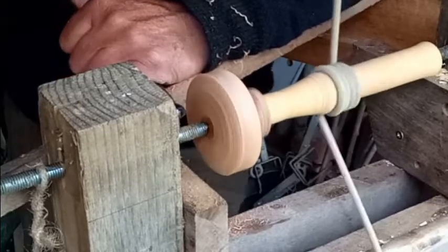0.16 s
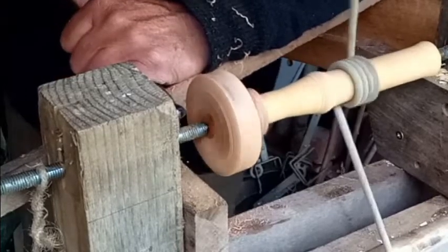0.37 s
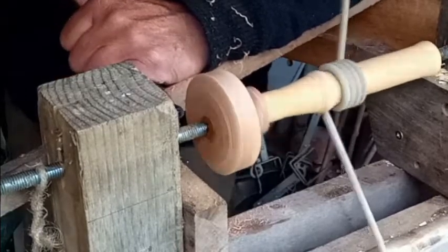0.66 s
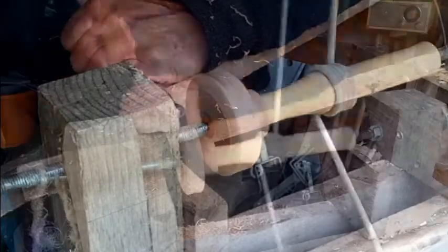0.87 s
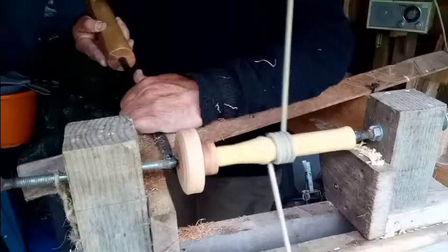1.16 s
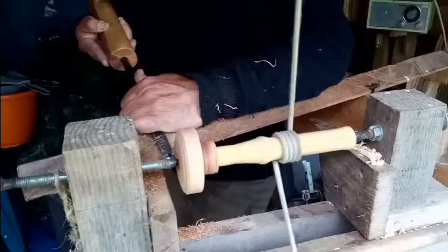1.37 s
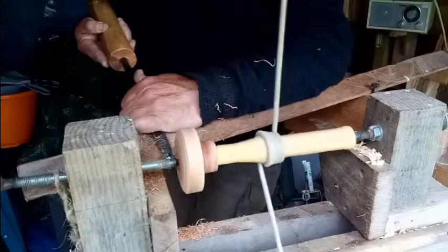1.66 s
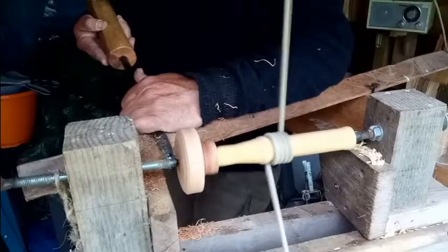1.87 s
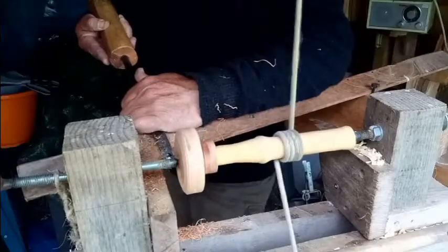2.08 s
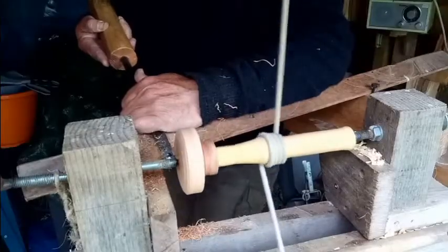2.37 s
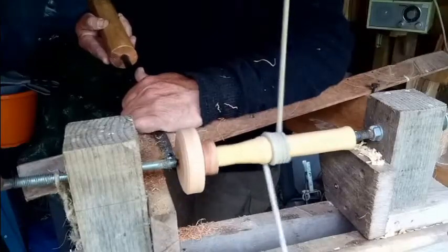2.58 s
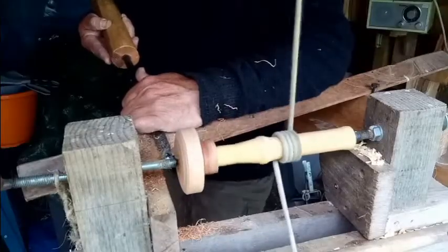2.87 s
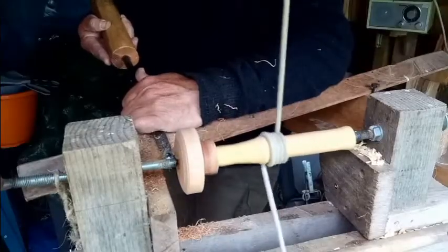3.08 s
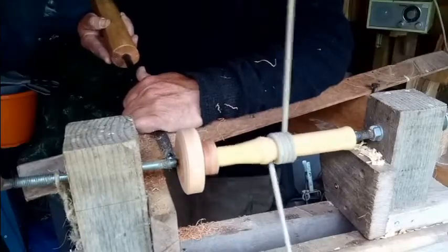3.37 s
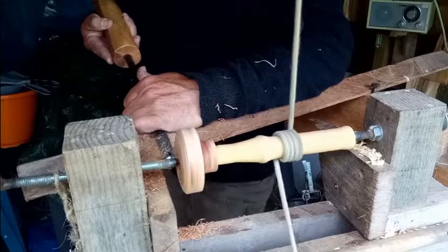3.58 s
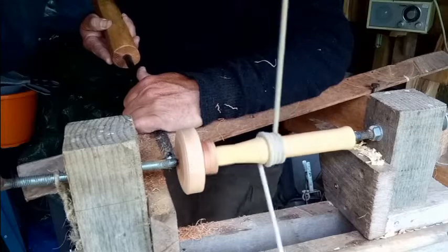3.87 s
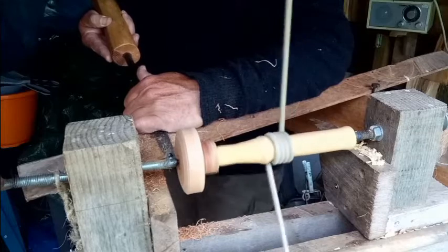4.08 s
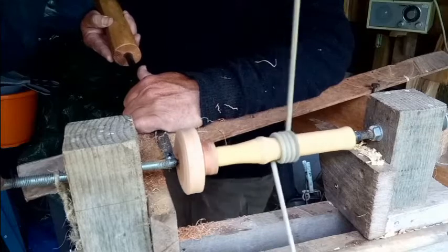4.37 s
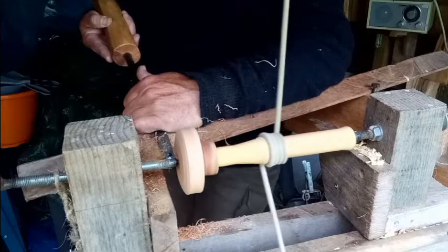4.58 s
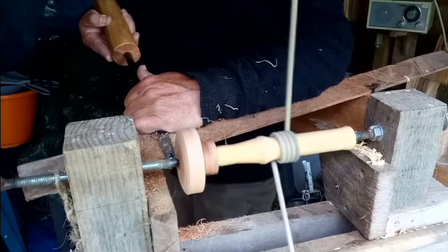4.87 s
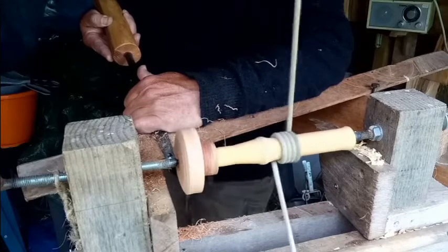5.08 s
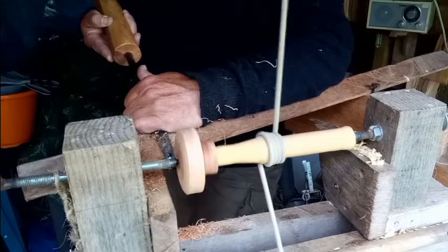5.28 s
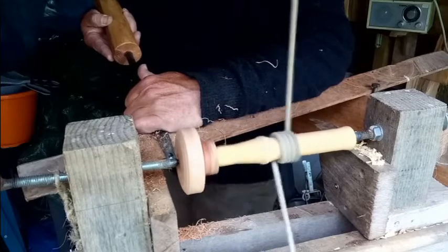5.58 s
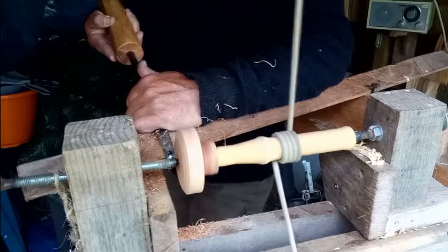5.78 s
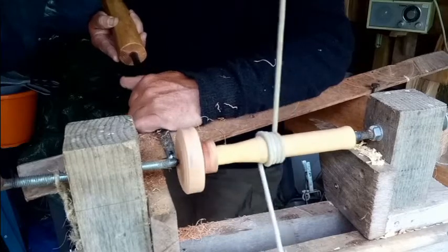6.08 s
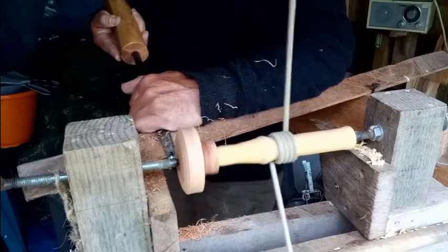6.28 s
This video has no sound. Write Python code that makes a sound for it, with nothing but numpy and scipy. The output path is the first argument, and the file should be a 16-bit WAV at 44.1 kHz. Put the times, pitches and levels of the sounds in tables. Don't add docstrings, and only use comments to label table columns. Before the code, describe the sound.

A foot-powered lathe is heard very close in a small shed, dry with a short echo and faint still air. Steel ticks lightly, and at about 0.2 s a gouge rasps into spinning wood, a bright, throbbing scrape with metallic ringing. A heavy cluster of hollow wooden knocks follows near 0.45 s. Further scrapes, each roughly 0.3 to 0.4 s, start near 0.95, 1.8, 2.5, 3.2, 4.0, 4.7, 5.5 and 6.15 s, the second longest, the third lighter. Small taps and brief steel rings precede many cuts, clear around 2.5 and 3.2 s. Between cuts the cord rubs softly, a dry centre squeaks faintly, and the frame rumbles. Several knocks cluster around 2.1 s, a sharp cord slap and thump land at 3.6 s, lighter knocks near 4.95 s, and a strong thump at 5.67 s. A last knock comes near 6.4 s.

```python
import sys
import numpy as np
from scipy import signal
from scipy.fft import rfft, irfft, next_fast_len
from scipy.io import wavfile
from scipy.ndimage import uniform_filter1d, map_coordinates

SR = 44100
rng = np.random.default_rng(int(sys.argv[2]) if len(sys.argv) > 2 else 0)


def elevation(decibels):
    levels = np.asarray(decibels, float)
    return 10 ** (levels / 20)


def output_pcm(signal):
    pcm = np.clip(np.atleast_2d(signal).T, -1, 1) * 32767
    wavfile.write(sys.argv[1], SR, np.round(pcm).astype(np.int16))


N = 284000
MS = np.arange(0, N / SR + .002, .001)

# f/Hz, level/dB per Hz
AIR = [(15, -58.5), (25, -14), (84, -2.5), (326, -1), (489, -7), (560, -17.5), (734, 2), (962, -4),
       (1330, -2), (3520, -14.5), (6380, -13), (10400, -29), (13600, -37.5), (14600, -25.5), (15400, -17),
       (16000, -27)]
# f/Hz, t60/s
SHED = [(200, 0.097), (2000, 0.19), (10000, 0.022)]
# f/Hz, left re right/dB
LEAN = [(60, 6), (110, 0), (200, 1), (380, 3.5), (700, 0.5), (1290, 1), (2380, 1), (4400, 6.5), (8120, 9),
        (15000, 14)]
# f/Hz, correlation/1
ALIKE = [(60, 0.93), (300, 0.93), (700, 0.62), (1500, .35), (4000, 0.45), (5300, 0.25), (5900, .82),
         (7300, .78), (7900, .12)]
# f/Hz, left lead/rad
TURN = [(20, 0), (600, .4), (1290, 1.1), (1550, 3), (1850, 6.3), (3000, 6.3), (3360, 8.8), (3750, 10.6),
        (4400, 9.6), (5100, 12.2), (5700, 12.57)]

# f/Hz, width/Hz, level/dB
BEAMS = [(154.4, 25, -6.5), (245.5, 112, -1.5), (382, 202, -2), (467.7, 66, 0), (655, 105, -5.5),
         (780, 251, -9.5)]
# t of full load/s, rumble level/dB, build-up/s, let-go/s, pole drone level/dB
LOADS = [(0.02, -55, 0.11, 0.089, -60.5), (0.474, -37, 0.12, 0.096, -49), (0.56, -59.5, 0.1, 1, -57),
         (1.22, -46, 0.2, 0.16, -54), (1.3, -61, 0.092, 0.079, -53), (1.6, -66, 0.16, 0.097, -93),
         (2.03, -42.5, 0.11, 0.32, -54), (2.15, -42.5, 0.15, 0.13, -68), (2.77, -45.5, 0.14, 0.16, -62),
         (2.99, -64, 0.067, 0.27, -72), (3.5, -43, 0.14, 0.14, -57), (3.641, -45.5, 0.12, 0.2, -51.5),
         (4.18, -51, 0.11, 0.26, -56), (4.56, -65, 0.16, 0.13, -77), (5.27, -63.5, .15, 0.094, -74),
         (4.969, -49.5, 0.18, 0.058, -51.5), (5.702, -38.5, 0.13, 0.095, -46), (5.9, -59, 0.054, 0.23, -63),
         (6.44, -39.5, 0.15, 0.1, -57)]
IDLE_RUMBLE_DB, IDLE_DRONE_DB, DRONE_BUILD_S, DRONE_FADE_S = -80, -72, 0.15, 0.088
SWELL_DB = 25
# f/Hz, level/dB per Hz
CORD = [(290, -34), (500, 6.5), (538, -3.5), (933, -14.5), (1340, -2), (2130, -12.5), (2770, -8.5),
        (3390, -15.5), (3750, -11), (4090, -14.5), (6420, -15), (9000, -34.5), (11000, -35.5), (16000, -40)]
# t of hardest rub/s, level/dB, build-up/s, let-go/s
RUBS = [(0.0, -60, 0.16, 0.17), (0.133, -78.5, 0.033, 0.3), (0.725, -61.5, 0.44, 0.56),
        (1.47, -65.5, 0.68, 1), (2.146, -57, 0.14, 0.12), (2.25, -65.5, 0.05, 0.68),
        (2.958, -62.5, 0.054, 0.45), (3.608, -50.5, 0.014, 0.091), (3.7, -67, 0.1, 0.96),
        (4.544, -65, 0.18, 0.21), (5.28, -66, 0.37, 0.13), (5.876, -63.5, 0.042, 0.5)]
# t/s, length/s, f/Hz, level/dB
CENTRE = [(0.246, 0.29, 278, -56.5), (0.618, 0.16, 3700, -69), (0.616, 0.088, 2900, -71.5),
          (1.392, 0.12, 3680, -63), (1.44, .07, 1655, -69), (1.44, .04, 2350, -69), (0.718, .06, 2780, -68),
          (1.6, 0.12, 241, -62), (1.64, 0.06, 2600, -71), (2.305, .04, 3150, -70.5),
          (2.972, .06, 5550, -69), (2.97, .06, 3930, -69), (3.0, 0.076, 2890, -72),
          (4.498, 0.16, 2590, -76), (5.226, .09, 4670, -68)]
# t/s, level/dB, f/Hz, width/Hz, t60/s
SLAPS = [(0.586, -49.5, 2300, 4770, 0.1), (1.459, -43.5, 6900, 7900, 0.017),
         (2.122, -41, 2600, 3940, 0.044), (2.95, -53, 2000, 3000, 0.051), (3.606, -40, 3700, 3000, 0.18),
         (3.607, -28, 3420, 300, 0.035), (5.67, -27, 1250, 660, 0.065), (5.69, -40, 1050, 1450, 0.22),
         (0.48, -29, 1330, 600, .06), (0.12, -54, 3100, 3000, 0.032), (2.271, -52, 1600, 2500, 0.044),
         (2.148, -46, 2500, 900, 0.055), (2.7, -39, 1550, 400, 0.052), (2.207, -50, 1600, 1200, .04),
         (0.63, -45, 710, 900, 0.047), (5.101, -56, 1100, 1500, 0.039), (5.873, -57, 2600, 5040, 0.063)]
# t/s, peak level/dB, loudest f/Hz, t60/s
KNOCKS = [(0.397, -17.5, 826, 0.049), (0.459, -7, 350, 0.064), (0.471, -11, 575, 0.028),
          (0.482, -23, 366, 0.071), (0.506, -30, 320, 0.095), (0.552, -28, 516, 0.043),
          (0.584, -36, 470, 0.052), (1.266, -27, 470, 0.039), (1.32, -34, 308, 0.14),
          (1.582, -46.5, 496, 0.065), (1.995, -23, 676, 0.054), (2.076, -19, 213, 0.052),
          (2.117, -17, 445, 0.04), (2.147, -18.5, 438, 0.075), (2.207, -27, 518, 0.034),
          (2.267, -37, 298, 0.25), (2.71, -23, 443, 0.07), (2.806, -18.5, 238, 0.032),
          (2.951, -44, 520, 0.072), (3.056, -40.5, 474, 0.32), (3.451, -18, 705, 0.039),
          (3.594, -32, 506, 0.13), (3.608, -10, 453, 0.039), (3.687, -27.5, 683, 0.051),
          (4.218, -26, 759, 0.16), (4.411, -60, 424, 0.063), (4.943, -24, 730, 0.062),
          (4.958, -23, 800, 0.091), (4.975, -27, 620, 0.075), (5.615, -25.5, 472, 0.17),
          (5.6702, -6, 370, 0.063), (5.6755, -10.5, 326, 0.06), (5.69, -8, 504, 0.051),
          (5.709, -17, 650, 0.044), (5.737, -22, 683, 0.053), (5.72, -25, 396, 0.068),
          (5.752, -21, 365, 0.051), (5.781, -35, 150, 0.19), (5.875, -34, 468, 0.065),
          (6.379, -20, 500, 0.087)]

# f/Hz, width/Hz, level/dB
REST = [(813, 16, -4), (1223, 11.5, -2.5), (1662, 34, -2), (2036, 42, -13.5), (2760, 31, -10.5),
        (3368, 36, 1), (4300, 70, 2), (4630, 56, -9.5), (7200, 97, -9)]
# t/s, peak level/dB, low f/Hz, high f/Hz, high re low/dB
TAPS = [(0.1341, -53, 2370, 4000, 3), (0.201, -49, 2490, 5160, 9), (0.2217, -37, 1560, 6840, -11),
        (0.943, -48, 3400, 7200, 4), (0.961, -37, 1560, 5070, -15), (1.79, -46, 1780, 7140, -1),
        (2.4559, -38, 2070, 4660, -6.5), (2.512, -32.5, 2390, 6460, -7), (3.1745, -39.5, 2100, 3450, -9),
        (3.236, -36.5, 1950, 3900, -1), (3.9408, -50, 2150, 3810, -11), (3.992, -41, 3520, 6200, -7),
        (4.738, -39.5, 3450, 7330, 17), (5.478, -31, 2470, 7140, 19), (6.075, -55, 1800, 3720, 7),
        (6.097, -46.5, 1900, 3630, 5), (6.114, -52.5, 1910, 3800, -5), (6.1534, -43, 1910, 6660, -9)]
TAP_T60_S, TAP_HIGH_DAMPS = 0.089, 0.026
TICK_DB, TICK_T60_S = -27, 0.035
# t/s, f/Hz, peak level/dB, t60/s
CATCHES = [(2.456, 1680, -44, .2), (2.459, 2116, -45, .15), (2.455, 3456, -50, .07),
           (2.459, 4064, -46, .07), (2.455, 7138, -48, .08), (2.455, 4700, -51, .06),
           (2.475, 4660, -47, .08), (2.475, 2756, -48, .1), (2.478, 1254, -53, .15),
           (2.476, 1680, -47, .15), (2.474, 4100, -48, .06), (3.174, 2110, -40, .13),
           (3.176, 1701, -44, .2), (3.178, 4156, -46, .11), (3.175, 7090, -47, .12), (3.178, 759, -54, .4),
           (3.177, 3817, -54, .11), (3.94, 2120, -55, .15), (3.94, 3860, -59, .15), (3.222, 4100, -51, .05),
           (6.075, 3505, -51, .09), (6.075, 4727, -56, .07), (6.076, 7144, -57, .06),
           (6.094, 4180, -57, .09), (6.099, 4700, -53, .1), (6.104, 760, -57, .3), (6.112, 1620, -54, .12),
           (4.734, 4600, -50, .15), (4.734, 3450, -54, .1)]
# t/s, length/s, f/Hz, level/dB
SINGS = [(0.205, .04, 5240, -44.5), (0.22, 0.068, 1020, -42.5), (0.293, 0.074, 1020, -40.5),
         (0.425, .04, 1001, -43), (1.03, 0.1, 1020, -37.5), (1.17, 0.044, 801, -47), (4.8, .07, 2390, -47),
         (2.57, 0.23, 3830, -38), (2.64, 0.099, 1060, -38), (3.235, .04, 780, -42.5),
         (3.29, 0.19, 774, -44), (.225, 0.1, 1620, -46), (4.03, 0.062, 780, -42),
         (4.765, 0.035, 6140, -37.5), (4.929, .06, 7100, -41), (0.957, 0.028, 5240, -52),
         (0.973, .05, 606, -44), (1.106, 0.048, 7040, -39.5), (1.835, 0.14, 1056, -40),
         (1.86, 0.15, 3830, -37), (3.28, 0.044, 4100, -34), (3.398, 0.094, 3110, -44),
         (4.111, 0.07, 4585, -34), (5.493, 0.081, 3830, -31), (5.53, 0.08, 1060, -39),
         (5.51, .04, 3090, -42), (5.57, 0.094, 3120, -44), (5.55, .025, 3830, -37),
         (5.52, 0.045, 2400, -44), (6.152, 0.081, 757, -45.5), (6.164, 0.056, 1830, -45.5)]

# t of bite/s, run-up/s, full speed/s, run-down/s, shaving level/dB
STROKES = [
    (0.211, 0.055, 0.14, 0.13, -32.5),
    (0.95, 0.062, 0.21, 0.15, -32),
    (1.782, 0.049, 0.18, 0.1, -34.5),
    (2.494, 0.074, 0.17, 0.11, -34),
    (3.223, 0.072, 0.2, 0.099, -33),
    (3.982, 0.064, 0.17, 0.11, -31.5),
    (4.733, 0.072, 0.13, 0.11, -31.5),
    (5.471, 0.034, 0.092, 0.18, -33.5),
    (6.151, 0.057, 0.17, 0.094, -32.5),
]
# t of a meeting/s, rate/Hz, depth/dB, reach of the gouge/1
GRAIN = [
    (0.252, 65, -2, 0.76),
    (1.033, 29.1, 1, 0.53),
    (1.83, 21, 1, 0.28),
    (2.528, 43.5, 2, 0.08),
    (3.298, 36, 1.3, 0.17),
    (4.055, 54, -0.5, 0.07),
    (4.788, 46, 0.1, 0.09),
    (5.509, 45.6, 2, 0.17),
    (6.2, 36.7, -1.2, 0),
]
# edge re shaving/dB, spindle re shaving/dB, centres re shaving/dB
HOLDS = [
    (-6, -8, -31),
    (-6, -12.5, -15.5),
    (-2.5, -10.5, -25),
    (-4, -9.5, -17.5),
    (-4, -9, -16.5),
    (-3.5, -9.5, -18),
    (-3.5, -8, -20),
    (-3.5, -12, -20),
    (-3.5, -8.5, -20.5),
]
FEED = [
    0.86,
    1.12,
    1.13,
    1.03,
    1,
    1.1,
    1,
    1.07,
    1.17,
]
CREEP = 0.17
REACH_WANDERS = 0.15
SHAVE_LAW, EDGE_LAW = (1.21, 2.28, -0.0546), (1.72, 3.37, -1.1)
SPINDLE_LAW, CENTRES_LAW = (1.7, 1.63, 5.3), (0.81, 1, 13)
# f/Hz, width/Hz, level/dB
TOOL = [(747, 54, -7.5), (1056, 33, -4.5), (1780, 87, -6.5), (2390, 30, -0.5), (2780, 40, -16),
        (3110, 20, 1), (3450, 260, -8), (3800, 26.8, 5.5), (4060, 82, -4), (4585, 61, -1.5),
        (5300, 29, -23), (6046, 51, -3.5), (6684, 97, -8.5), (7140, 86, -2)]
# f/Hz, width/Hz, level/dB
TOOL_OUT = [(759, 38, -9.5), (1020, 21, -5), (1560, 30, -11.5), (1803, 17, -7), (2464, 100, -7),
            (2780, 29, -1.5), (3080, 200, -10), (3404, 36, -2), (3830, 146, 0.5), (4530, 150, -19),
            (5250, 40, -12.5), (6178, 143, 10.5), (6570, 120, 2.5), (7040, 76, 11.5)]
# f/Hz, width/Hz, level/dB
CENTRES_RING = [(504, 24, -10)]
# f/Hz, level/dB per Hz
SHAVING = [(180, -86), (300, -30.5), (499, -2), (588, -5), (753, -10), (1360, -5), (1740, 0), (5200, -3.5),
           (6880, -3.5), (8000, -39), (10400, -52), (17600, -120)]
# f/Hz, level/dB per Hz
SIZZLE = [(4470, -43.5), (7600, -2), (7880, -49.5), (8360, -11.5), (9360, -4.5), (10100, -13),
          (11000, -6.5), (13600, -14.5), (14900, -5), (15800, -11)]


def unit(x):
    return x / np.sqrt(np.mean(x ** 2) + 1e-20)


def along(points, hz):
    f, v = np.transpose(points)
    return np.interp(np.log(hz + 1), np.log(f + 1), v)


def smooth(per_ms):
    return np.interp(np.arange(N) / SR, MS, per_ms)


def wobble(rate):
    knots = rng.standard_normal(int(N * rate / SR) + 5)
    return smooth(map_coordinates(knots, [MS * rate]))


def flutter(t, rate):
    return map_coordinates(rng.standard_normal(40), [rate * t])


def add_at(out, s, sound):
    start = round(s * SR)
    out[..., start:start + sound.shape[-1]] += sound


def row_at(table, t):
    return np.clip(np.searchsorted(np.array(table)[:, 0] - .1, t) - 1, 0, None)


def filtered(x, response, lo_hz=0, hi_hz=0):
    m = next_fast_len(N + SR // 2)
    hz = np.fft.rfftfreq(m, 1 / SR)
    gain = response(hz)
    if hi_hz:
        band = (hz > lo_hz) & (hz < hi_hz)
        gain = gain / np.sqrt(np.sum(np.abs(gain[band]) ** 2) / len(hz))
    return irfft(rfft(x, m) * gain, m)[..., :N]


def resonances(modes, f):
    total = 0
    for k, (centre_hz, width, db) in enumerate(modes):
        damping = 1j * f * width
        total = total + (-1) ** k * elevation(db) * damping / (centre_hz ** 2 - f * f + damping)
    return total


def rush(patchy_db, size=14):
    z = signal.stft(rng.standard_normal((2, N)), nperseg=512)[2]
    field = uniform_filter1d(rng.standard_normal(z.shape[1:]), size=2, axis=0)
    field = uniform_filter1d(field, size=size, axis=1)
    pair = signal.istft(z * elevation(patchy_db * unit(field)), nperseg=512)[1][:, :N]

    def mid_and_side(hz):
        angle = np.arccos(np.clip(along(ALIKE, hz), -1, 1)) / 2
        return np.array([np.cos(angle), np.sin(angle)])
    mid, side = filtered(pair, mid_and_side)
    return unit(np.array([mid + side, mid - side]))


def swells(rows):
    power = 0
    for s, db, rise, fall in rows:
        distance = np.where(MS < s, (s - MS) / max(rise, .01), (MS - s) / max(fall, .01))
        power = power + elevation(2 * (db - SWELL_DB * distance))
    return smooth(np.sqrt(power))


def still_air():
    return filtered(elevation(-68) * rush(patchy_db=1.5), lambda f: elevation(along(AIR, f)), 25, 15770)


def shed(x):
    hz, t, z = signal.stft(rng.standard_normal((2, SR // 3)), SR, nperseg=256)
    alike = np.clip(along(ALIKE, hz), 0, 1)[:, None]
    z[1] = alike * z[0] + np.sqrt(1 - alike ** 2) * z[1]
    decay = elevation(-60 * t / along(SHED, hz)[:, None])
    tail = signal.istft(z * decay, SR, nperseg=256)[1]
    return signal.fftconvolve(x, tail / np.linalg.norm(tail[0]), axes=1)[:, :N]


def frame():
    rumble = swells([load[:4] for load in LOADS]) + elevation(IDLE_RUMBLE_DB + wobble(7.5))
    drone = swells([(s, db, DRONE_BUILD_S, DRONE_FADE_S) for s, *_, db in LOADS])
    drone = drone + elevation(IDLE_DRONE_DB + 4 * wobble(8))
    lumps = rush(patchy_db=3.5) * unit(elevation(2.04 * wobble(70) + 2.6 * wobble(25)))
    beams = filtered(lumps * rumble * elevation(3.0), lambda f: resonances(BEAMS, f), 130, 590)
    hum = rush(patchy_db=0.0) * drone * elevation(0.5)
    pole = filtered(hum, lambda f: resonances([(92.8, 17.4, 0)], f), 65, 160)
    return beams + pole


def cord():
    rub = rush(patchy_db=3.5) * unit(elevation(1.47 * wobble(30))) * swells(RUBS) * elevation(4.5)

    def response(f):
        stirred = elevation(-21) * resonances(TOOL, f) / (1 + (f / 7800) ** 16)
        return elevation(along(CORD, f)) + stirred
    return filtered(rub, response, 980, 8400)


def fluttering(rows):
    out = np.zeros(N + SR)
    for s, length, hz, db in rows:
        t = np.arange(round(length * SR)) / SR
        level = elevation(db + 6.9 * flutter(t, 60)) * np.sin(np.pi * t / length)
        add_at(out, s, level * np.sin(2 * np.pi * hz * t + 1.1 * flutter(t, 80)))
    return out[:N]


def centre():
    return fluttering(CENTRE)


def slaps():
    out, t = np.zeros((2, N + SR)), np.arange(SR // 4) / SR
    f = np.fft.rfftfreq(len(t), 1 / SR)
    for s, db, hz, width, t60 in SLAPS:
        body = resonances([(hz, width, 0)], f) ** 2 / (1 + (f / 7600) ** 12)
        puff = irfft(rfft(rng.standard_normal((2, len(t)))) * body, len(t))
        add_at(out, s, elevation(db - 60 * t / t60) * (1 - np.exp(-t / .003)) * unit(puff))
    return out[:, :N]


def knocks():
    out, t = np.zeros((2, N + SR)), np.arange(SR // 4) / SR
    for s, db, top_hz, t60 in KNOCKS:
        ring = np.sin(2 * np.pi * top_hz * t)
        for hz, _, level in BEAMS:
            strength = elevation(level - 6 + rng.normal(0, 3.8))
            ring = ring + strength * np.sin(2 * np.pi * hz * t + rng.uniform(0, 0.12, (2, 1)))
        envelope = elevation(-60 * t / max(t60, .01)) * (1 - np.exp(-t / 0.002))
        add_at(out, s, elevation(db - 11.0) * ring * envelope)
    return filtered(out[:, :N], lambda f: (1j * f / (80 + 1j * f)) ** 2)


def catches():
    out, t = np.zeros(N + SR), np.arange(SR // 8) / SR
    for s, hz, db, t60 in CATCHES:
        level = elevation(db - 60 * t / t60 + 3 * flutter(t, 150)) * (1 - np.exp(-t / .0015))
        add_at(out, s, level * np.sin(2 * np.pi * hz * t + .7 * flutter(t, 150)))
    return out[:N] * elevation([[2.5], [-5]])


def taps():
    out, t = np.zeros((2, N + SR)), np.arange(SR // 4) / SR
    f = np.fft.rfftfreq(len(t), 1 / SR)
    soft = 1 / (1 + 1j * f / 8000) ** 2
    for s, db, low_hz, high_hz, high_db in TAPS:
        skid = np.exp(-t / 0.018) * (1 - np.exp(-t / 0.0013))
        burst = rng.standard_normal((2, len(t))) * skid
        burst[1] = .8 * burst[0] + .6 * burst[1]
        width = np.log(1000) / np.pi / (TAP_T60_S * np.exp(-TAP_HIGH_DAMPS * high_db))
        modes = []
        for hz, w, level in REST:
            tilt_db = high_db if hz > 3000 else 0
            modes.append((hz, w, level - 2 + rng.normal(0, 2.7) + tilt_db))
        modes += [(low_hz, 1.3 * width, 0), (high_hz, 2.5 * width, high_db + 1)]
        ring = irfft(rfft(burst) * soft * (resonances(modes, f) + elevation(-51)), len(t))
        tick = elevation(TICK_DB - 60 * t / TICK_T60_S) * rng.standard_normal((2, len(t)))
        add_at(out, s, elevation(db + 6.5) * (ring / np.abs(ring).max() + tick))
    return out[:, :N]


def singing_modes():
    return fluttering(SINGS)


def spin(law, trims_db=np.zeros(len(STROKES))):
    starting, stopping, deepens_db = law
    stroke = row_at(STROKES, MS)
    s, rise, hold, fall, db = np.transpose(STROKES)[:, stroke]
    creep = CREEP * np.logaddexp(0, (MS - s) / rise / CREEP)
    up = np.clip(creep, 1e-4, 1)
    down = np.clip((s + rise + hold + fall - MS) / fall, 1e-4, 1)
    depth = np.clip((MS - s - rise) / hold, 0, 1) - .5
    speed = up ** (starting * np.array(FEED)[stroke]) * down ** stopping
    return smooth(db + trims_db[stroke] + deepens_db * depth + 20 * np.log10(speed))


def gouge():
    edge_trim, spindle_trim, centres_trim = np.transpose(HOLDS)
    shave_db = spin(SHAVE_LAW)
    edge_db = spin(EDGE_LAW, edge_trim) - shave_db
    spindle_db = spin(SPINDLE_LAW, spindle_trim) - shave_db
    t = np.arange(N) / SR
    s, rate, depth_db, reach = np.transpose(GRAIN)[:, row_at(GRAIN, t)]
    throb_db = depth_db * np.cos(2 * np.pi * rate * (t - s) + 0.33 * wobble(5.0))
    tear = rush(patchy_db=3, size=8) * unit(elevation(throb_db + 1.3 * wobble(400) + 0.7 * wobble(60)))

    deep = lambda f: 1 / (1 + (f / 640) ** 8)
    low = lambda f: 1 / (1 + (f / 1350) ** 8)
    high = lambda f: 1 - 1 / (1 + (f / 5000) ** 8)

    chips = tear * elevation(shave_db + 1.15 * edge_db - 14)
    out = filtered(chips, lambda f: elevation(along(SIZZLE, f)), 8950, 13000)
    centres = lambda f: deep(f) * (elevation(along(SHAVING, f)) + resonances(CENTRES_RING, f))
    out += filtered(tear * elevation(spin(CENTRES_LAW, centres_trim)), centres, 300, 640)

    reach = np.clip(reach + REACH_WANDERS * wobble(9), 0, 1)
    grid = np.fft.rfftfreq(next_fast_len(N + SR // 2), 1 / SR)
    hiss = elevation(-13 + along(SHAVING, grid))
    for modes, share in ((TOOL, 1 - reach), (TOOL_OUT, reach)):
        damped = [(hz, max(width, 42), db) for hz, width, db in modes]
        body = resonances(damped, grid) + hiss
        drive = tear * np.sqrt(share) * elevation(shave_db - 0.5)
        out += filtered(drive * elevation(spindle_db), lambda f: body * (low(f) - deep(f)), 600, 1300)
        out += filtered(drive, lambda f: body * (1 - low(f) - high(f)), 1400, 5000)
        out += filtered(drive * elevation(edge_db), lambda f: body * high(f), 5000, 7600)
    return out


def scene():
    lathe = gouge() + singing_modes() + taps() + catches() + knocks() + slaps() + centre()
    echo = elevation(-13) * shed(lathe)
    return lathe + echo + frame() + cord() + still_air()


def roll_off(x):
    return signal.sosfilt(signal.butter(12, 16410, fs=SR, output="sos"), x)


def record(dry):
    side = np.array([[1], [-1]])

    def ports(hz):
        level = elevation(side * along(LEAN, hz) / 2)
        phase = np.exp(.5j * side * along(TURN, hz))
        return level * phase * np.clip((15800 - hz) / 250, 0, 1)
    mix = filtered(dry, ports)
    return roll_off(mix)


dry = scene()
out = record(dry)
output_pcm(out)
```